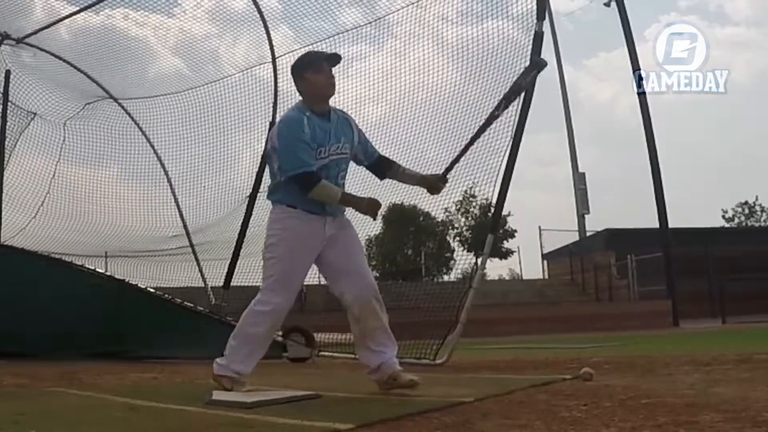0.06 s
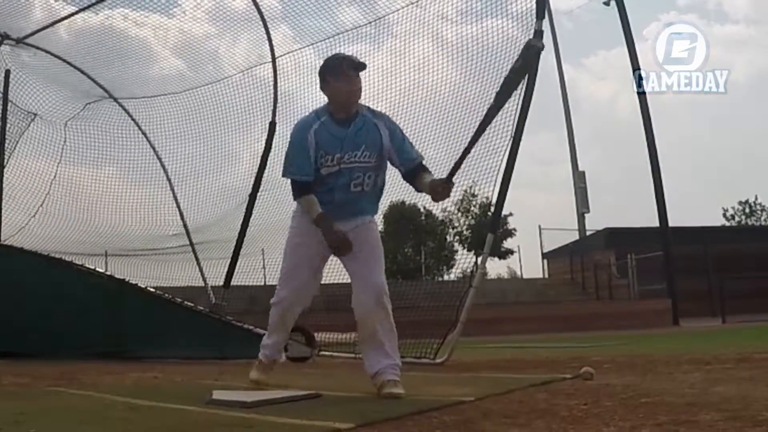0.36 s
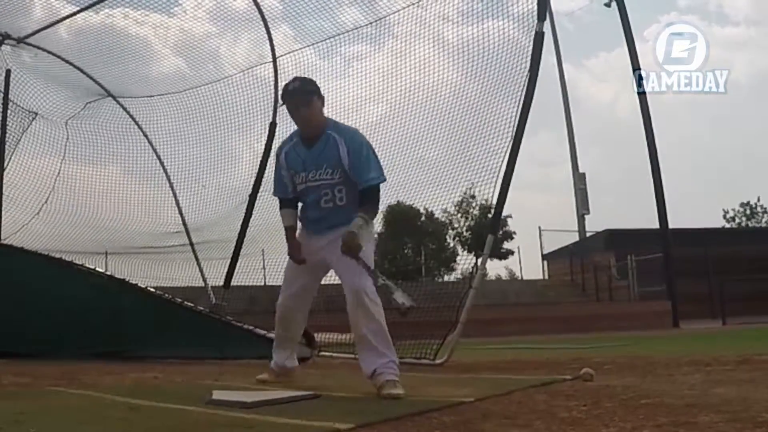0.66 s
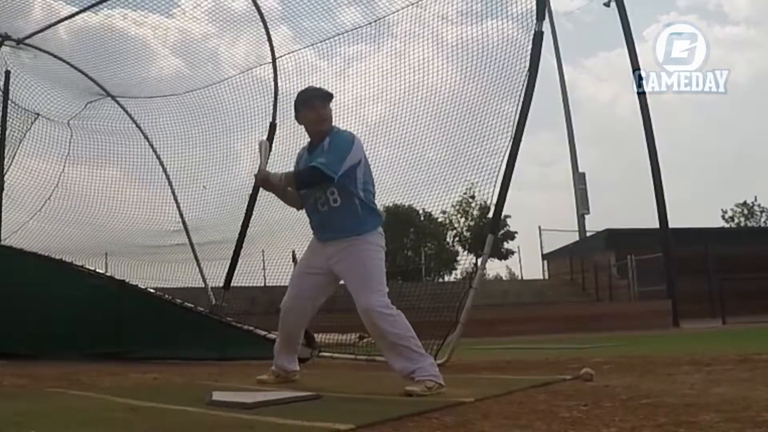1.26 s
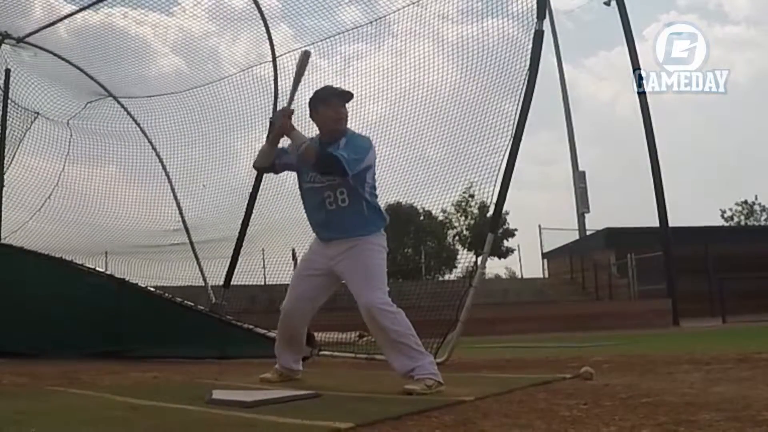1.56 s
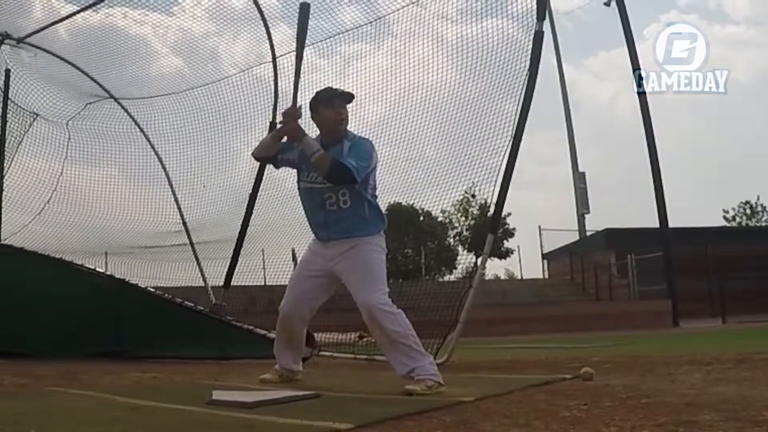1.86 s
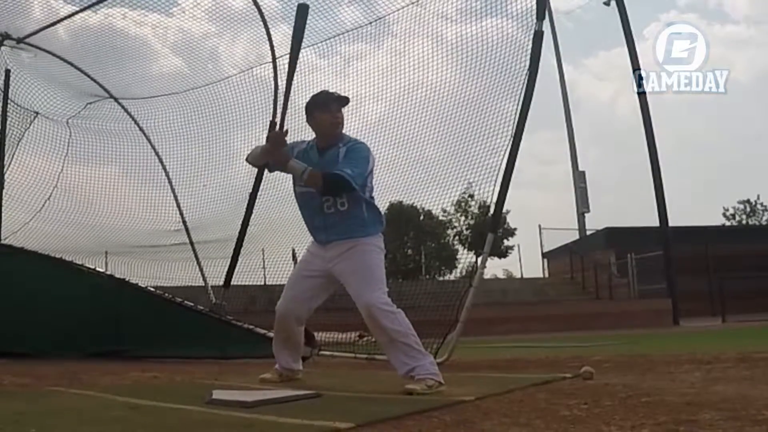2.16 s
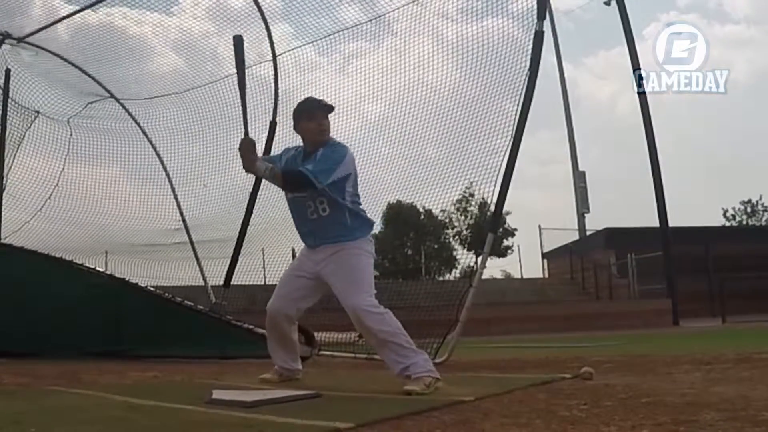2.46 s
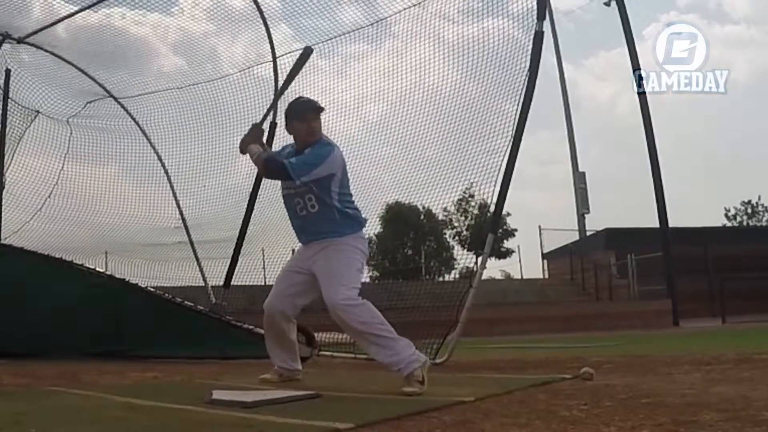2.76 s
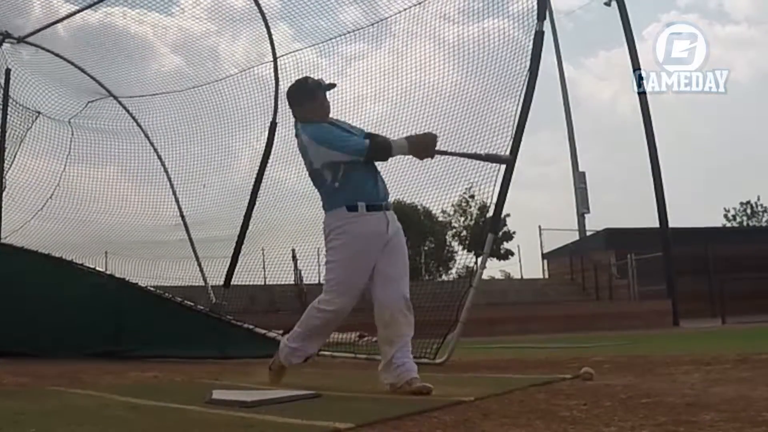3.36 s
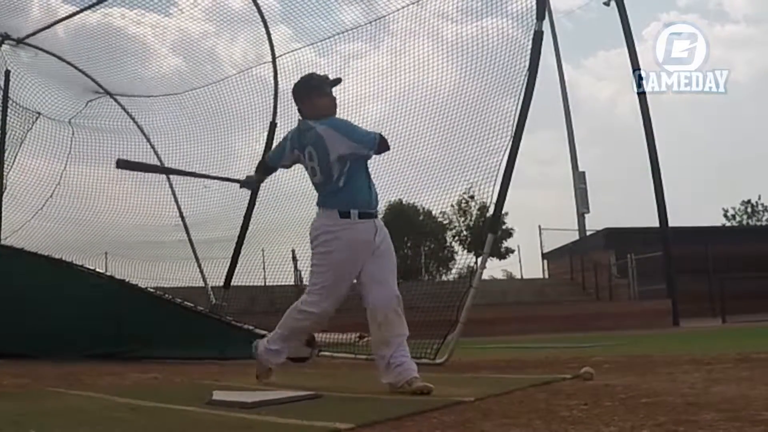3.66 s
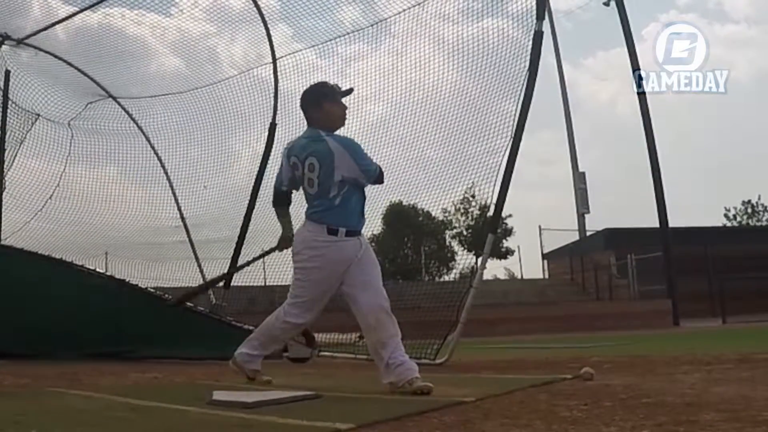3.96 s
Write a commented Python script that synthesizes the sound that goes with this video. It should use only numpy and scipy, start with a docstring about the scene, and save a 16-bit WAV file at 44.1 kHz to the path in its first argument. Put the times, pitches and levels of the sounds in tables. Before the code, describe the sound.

A sharp crack of a bat hitting a baseball, with wind rumbling on the microphone.

```python
"""An outdoor batting cage. A batter waits, then hits one pitched baseball: bat and ball ring for
an instant, making a sharp crack. It bounces off the ground, scatters in the cage and comes back
from fences and walls round the field. Throughout, gusts rumble on the microphone and air rushes
softly and whistles faintly, over a far town, a thin electronic whine and a few quiet shoe scuffs."""
import sys
import numpy as np
from scipy import signal
from scipy.fft import rfft, irfft
from scipy.io import wavfile
from scipy.ndimage import uniform_filter1d

SR = 44100
rng = np.random.default_rng(int(sys.argv[2]) if len(sys.argv) > 2 else 0)


def transcribe(signal):
    """Save signal, clipped to [-1, 1], as a 16-bit WAV file at the path in sys.argv[1]."""
    frames = np.atleast_2d(signal).T
    limited = np.clip(frames, -1, 1)
    pcm = np.round(limited * 32767).astype(np.int16)
    wavfile.write(sys.argv[1], SR, pcm)


N = 176400
T = np.arange(N) / SR
HIT_S = 3.3191

# The steady breeze at the microphone: time_s, rumble_db, rush_db
BREEZE = [(0, -11, -69), (.3, -24, -65.5), (.55, -24.5, -67), (.85, -23.5, -70), (1.0, -29, -71.5),
          (1.2, -26.5, -72), (1.55, -18.5, -68.5), (1.72, -18, -67.5), (2.05, -19, -55.5),
          (2.27, -18.5, -63), (2.37, -20.5, -59), (2.62, -17.5, -60.5), (2.9, -19.5, -68),
          (3.25, -17.5, -62.5), (3.56, -23, -69), (3.75, -16.5, -68), (3.97, -22.5, -57.5)]
# Single swirls of air that hit the microphone: time_s, thump_db, rush_db
GUSTS = [(0.171, -14, -61.5), (0.281, -12.5, -76), (0.334, -11.5, -60.5), (.485, -12, -68),
         (0.612, -17.5, -75), (0.737, -12.5, -66), (.845, -23.5, -74), (0.914, -18, -75), (1.082, -19, -71),
         (1.309, -16.5, -68), (1.43, -18, -75), (1.755, -11.5, -57.5), (1.858, -11.5, -61),
         (1.92, -13, -57), (2.012, -12, -57), (2.158, -11.5, -61.5), (2.34, -11, -53.5),
         (2.391, -12.5, -64.5), (2.47, -16, -56.5), (2.534, -11, -63), (2.621, -18, -69.5),
         (3.0, -11.5, -66), (3.135, -16, -64), (3.207, -15.5, -61), (3.279, -10, -55.5), (3.72, -15.5, -75),
         (3.8, -18.5, -74), (3.852, -12.5, -65)]


def from_db(db):
    """Turn decibels into a number to multiply a sound by."""
    return 10 ** (np.asarray(db) / 20)


def rms_one(x):
    """Scale a sound so that its average strength (rms) is 1."""
    return x / np.sqrt(np.mean(x ** 2) + 1e-20)


def in_time(rows):
    """Join timed rows with straight lines, giving one curve for each column after the time."""
    times, *columns = np.transpose(rows)
    return [np.interp(T, times, column) for column in columns]


def swell(time_s, width_s):
    """A smooth bump of height 1 around time_s."""
    return np.exp(-((T - time_s) / width_s) ** 2)


def dying(t, fade_s):
    """Silent before t = 0, then falling by 60 dB every fade_s."""
    return (t >= 0) * np.exp(-np.log(1000) * np.maximum(t, 0) / fade_s)


def delayed(x, delay_s):
    """The same sound, later."""
    return np.interp(T - delay_s, T, x, left=0)


def butter(x, hz, kind, order=2):
    """Keep the lows, the highs or one band of a sound."""
    return signal.sosfilt(signal.butter(order, hz, kind, fs=SR, output="sos"), x + 1e-18)


def resonance(x, hz, q):
    """Keep the sound near one pitch; a higher q keeps a narrower band."""
    return signal.lfilter(*signal.iirpeak(hz, q, fs=SR), x + 1e-18)


def ring(force, hz, fade_s):
    """A push starts a tone that falls by 60 dB in fade_s."""
    decay = np.exp(-np.log(1000) / (fade_s * SR))
    angle = 2 * np.pi * hz / SR
    return signal.lfilter([.5, 0, -.5], [1, -2 * decay * np.cos(angle), decay ** 2], force + 1e-18)


def noise(spectrum):
    """Noise of strength 1, its lows and highs balanced by rows of pitch_hz, level_db."""
    hz, db = np.transpose(spectrum)
    bins_hz = np.maximum(np.arange(N // 2 + 1) * SR / N, 1)
    gain = from_db(np.interp(np.log(bins_hz), np.log(hz), db))
    return rms_one(irfft(rfft(rng.standard_normal(N)) * gain, N))


def drift(rate_hz):
    """A random wobble of strength 1, mostly slower than rate_hz."""
    bins_hz = np.arange(N // 2 + 1) * SR / N
    return rms_one(irfft(rfft(rng.standard_normal(N)) / (1 + (bins_hz / rate_hz) ** 2), N))


def wind_rumble(swirls, level_db=1.02, flutter_db=.55, split_hz=85.6, brightening=.027):
    """Deep swings of air pressure on the microphone surge with each gust and sink in the lulls."""
    # The tone of the rumble: pitch_hz, level_db
    spectrum = [(10, -12), (20, -6.5), (30, 3), (50, -2), (70, -13.5), (100, -21), (140, -33.5),
                (200, -43.5), (300, -58), (600, -72), (1500, -93), (15000, -130)]
    # Moments when the rumble drops away: time_s, dip_db
    lulls = [(0.037, -13), (.235, -1.5), (0.539, -7.5), (.66, -4.5), (1.014, -8.5), (1.16, -5.5),
             (1.215, -4), (2.09, -7.5), (2.94, -9.5), (3.599, -3.5)]
    breeze_db, _ = in_time(BREEZE)
    gust_power = sum(from_db(db) ** 2 * swell(s, width_s=.014) for s, db, _ in GUSTS)
    lull_db = sum(db * swell(s, width_s=.021) for s, db in lulls)
    strength = np.sqrt(from_db(breeze_db) ** 2 + gust_power)
    strength *= from_db(level_db + lull_db + flutter_db * swirls)
    rumble = noise(spectrum)
    # Even out the noise so that the wind sets its loudness.
    rumble /= np.sqrt(uniform_filter1d(uniform_filter1d(rumble ** 2, size=1500), size=1500))
    deep, upper = (butter(butter(rumble, split_hz, kind), split_hz, kind) for kind in ("low", "high"))
    # Stronger wind sounds slightly brighter.
    return strength * (deep + upper * rms_one(strength) ** brightening)


def wind_whistle(flow, share_db=-9.5):
    """Air sings faintly on the edges of the camera housing."""
    # Flares where the air meets an edge squarely: time_s, level_db
    flares = [(.17, -65), (.34, -66), (.735, -69), (1.925, -65), (2.07, -63), (2.16, -65), (2.47, -68),
              (2.6, -63), (2.645, -66.5), (2.75, -63.5), (3.135, -61.5)]
    flare_power = sum(from_db(db) ** 2 * swell(s, width_s=.021) for s, db in flares)
    strength = np.sqrt((flow * from_db(share_db)) ** 2 + flare_power)
    return strength * rms_one(resonance(rng.standard_normal(N), hz=1572, q=18))


def wind(flutter_db=2):
    """Moving air makes a soft rush that swells with the gusts, along with its whistle and rumble."""
    # The tone of the rushing air: pitch_hz, level_db
    spectrum = [(100, -5.5), (250, 2.5), (400, 2), (700, -1.5), (1050, 1.5), (1350, -2), (1600, 0.5),
                (1850, -3), (2100, -8), (2500, -8.5), (3000, -15.5), (4000, -18), (6000, -25.5),
                (15000, -41)]
    swirls = drift(rate_hz=14)
    _, breeze_db = in_time(BREEZE)
    gust_power = sum(from_db(db) ** 2 * swell(s, width_s=.021) for s, _, db in GUSTS)
    flow = np.sqrt(from_db(breeze_db) ** 2 + gust_power)
    rush = flow * noise(spectrum) * from_db(flutter_db * swirls)
    return rush + wind_whistle(flow) + wind_rumble(swirls)


def background():
    """Still air and a far town blend into a quiet, steady hush."""
    # The tone of the hush: pitch_hz, level_db
    spectrum = [(30, 10), (200, 3), (400, 1.5), (630, -1), (1000, -8.5), (1600, -14.5), (2300, -12.5),
                (3500, -10.5), (5000, -15), (8000, -18.5), (12500, -22), (15000, -31.5)]
    return from_db(-59.5) * noise(spectrum)


def whine(pitch_hz=12618, level_db=-81):
    """The camera's electronics give off one thin, high tone."""
    return from_db(level_db) * np.sqrt(2) * np.sin(2 * np.pi * pitch_hz * T)


def shoe_scuffs():
    """Shoes rub the mat in short gritty bursts, longer as the batter turns after the swing."""
    # Each rub of a shoe: time_s, level_db, half_length_s
    scuffs = [(0.31, -65.5, .006), (0.523, -67, .005), (.66, -69, 0.0041), (1.137, -67, 0.0051),
              (1.222, -65, 0.0036), (1.345, -62.5, 0.0046), (3.988, -69.5, 0.013)]
    strength = sum(from_db(db) * np.exp(-.5 * ((T - s) / half_s) ** 2) for s, db, half_s in scuffs)
    return strength * rms_one(resonance(rng.standard_normal(N), hz=3520, q=8.2))


def bat_crack(contact_s=.0001, gain_db=-.5):
    """A very short push sets bat and ball ringing with tones that die fast, over a slight thud."""
    # The tones that bat and ball ring with: pitch_hz, level_db, fade_s
    tones = [(940, -8, 0.015), (1164, 1, 0.0045), (1503, -1.5, 0.0077), (2050, -26, 0.022),
             (2730, -6, 0.0013), (3320, -3, 0.0068), (3960, -11.5, 0.01), (5070, -18, 0.0076),
             (5550, -26.5, .025), (6370, -23, 0.013), (7810, -23, 0.0073), (9980, -23.5, .0078),
             (12270, -20.5, 0.0041), (14900, -25.5, 0.0031)]
    force = np.exp(-.5 * ((T - HIT_S) * 2 * np.pi / contact_s) ** 2)
    force /= force.sum()
    # Every second tone starts by swinging the opposite way.
    crack = sum((-1) ** k * from_db(db) * ring(force, hz, fade_s)
                for k, (hz, db, fade_s) in enumerate(tones))
    thud = from_db(-21.5) * ring(force, hz=270, fade_s=.0094)
    return from_db(gain_db) * (crack + thud)


def near_bounces(crack):
    """The ground and the cage's skirt throw back dull copies of the crack."""
    # Each bounce: delay_s, level_db
    bounces = [(.00364, -9.5), (.00519, -8)]
    dull = butter(crack, hz=1600, kind="low")
    return sum(from_db(db) * delayed(dull, delay_s) for delay_s, db in bounces)


def scatter(rise_s=.0023, late_fade_s=.48, clump_db=3):
    """Countless tiny echoes blur into a quick tail from the cage and a faint long one from the field."""
    # The tails, in bands half an octave wide: pitch_hz, early_db, early_fade_s, late_db
    bands = [(485, -57, 0.083, -74.5), (974, -36, 0.043, -49.5), (1260, -43, .11, -52.5),
             (1647, -38, .11, -60.5), (2330, -40, 0.15, -55.5), (3260, -39, 0.091, -50),
             (4350, -33.5, 0.046, -54), (6140, -42, 0.06, -63), (8900, -53.5, 0.06, -74),
             (12700, -56, .05, -79.5)]
    age_s = T - HIT_S
    tails = np.zeros(N)
    for hz, early_db, early_fade_s, late_db in bands:
        band = rms_one(butter(rng.standard_normal(N), [hz / 2 ** .25, hz * 2 ** .25], "band", order=3))
        early = from_db(early_db) * dying(age_s, early_fade_s)
        late = from_db(late_db) * dying(age_s, late_fade_s)
        tails += band * (early + late)
    clumps = rms_one(from_db(clump_db * drift(rate_hz=260)))  # the echoes arrive unevenly
    rise = 1 - np.exp(-np.maximum(age_s, 0) / rise_s)
    return tails * clumps * rise


def far_echoes(crack, smear_db=-11):
    """Fences and walls send the crack back slightly smeared, each favouring one pitch."""
    # Each echo, a band round that pitch plus a plain copy: delay_s, band_db, pitch_hz, plain_db
    echoes = [(.0105, -27.5, 3970, -40), (0.014, -26, 3010, -31), (0.033, -9.5, 4040, -22.5),
              (0.037, -27, 4000, -26), (0.045, -30, 3920, -34), (0.052, -33, 3950, -43),
              (0.0606, -36, 4200, -33), (.1358, -31, 3330, -48), (.2585, -35, 3580, -60),
              (0.29, -38.5, 3540, -59)]
    smear = (rng.standard_normal(N) * dying(T, fade_s=.024))[:SR // 10]
    smear /= np.linalg.norm(smear)
    rough = crack + from_db(smear_db) * signal.fftconvolve(crack, smear)[:N]
    return sum(delayed(from_db(band_db) * resonance(rough, hz, q=9.2) + from_db(plain_db) * rough, s)
               for s, band_db, hz, plain_db in echoes)


def scene():
    """The hit and its echoes in the windy open air, in one channel."""
    crack = bat_crack()
    hit = crack + near_bounces(crack) + far_echoes(crack) + scatter()
    return (hit + wind() + shoe_scuffs() + background())[None]


def record(dry):
    """The camera adds its whine and cuts the highest treble."""
    cutoff_hz = 15600
    treble_cut = signal.ellip(10, .1, 80, cutoff_hz, fs=SR, output="sos")
    return signal.sosfilt(treble_cut, dry + whine())


dry = scene()
out = record(dry)
transcribe(out)
```